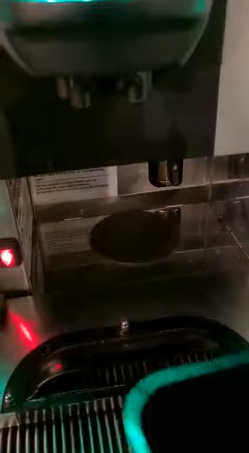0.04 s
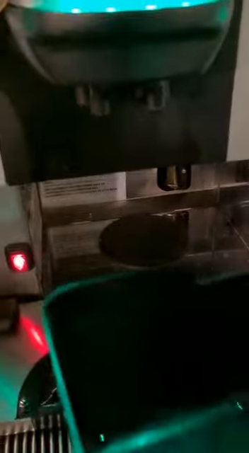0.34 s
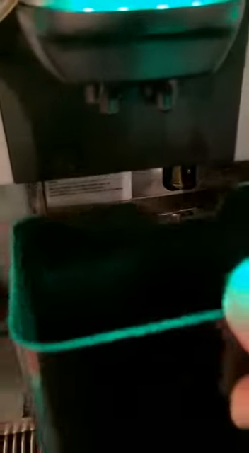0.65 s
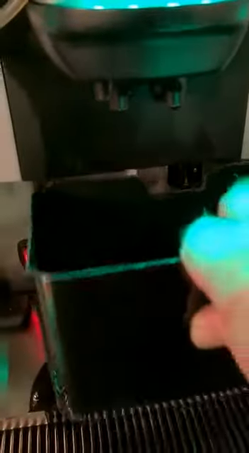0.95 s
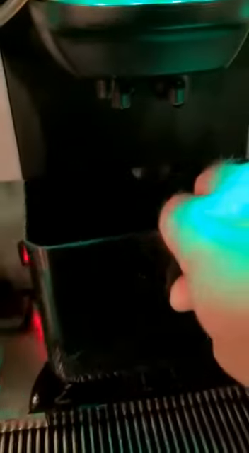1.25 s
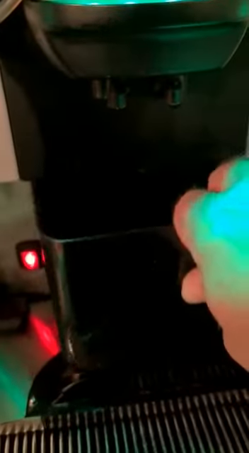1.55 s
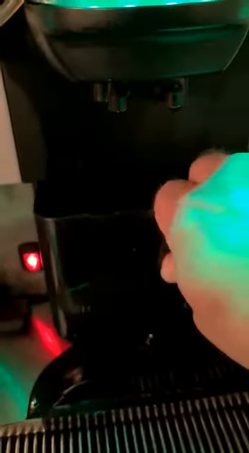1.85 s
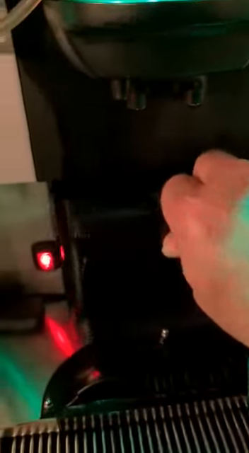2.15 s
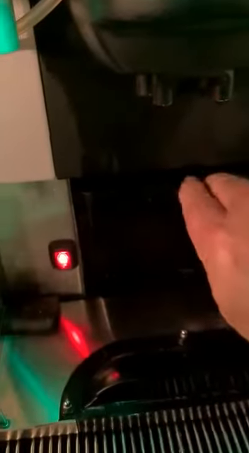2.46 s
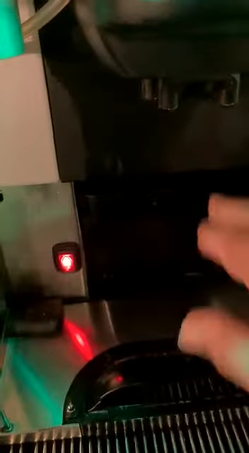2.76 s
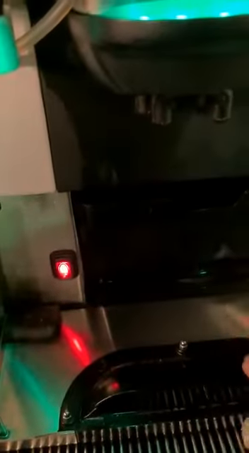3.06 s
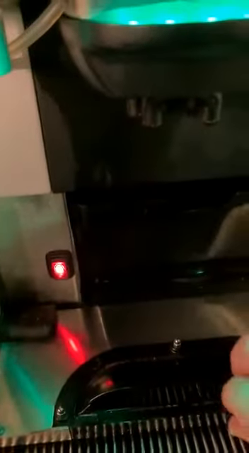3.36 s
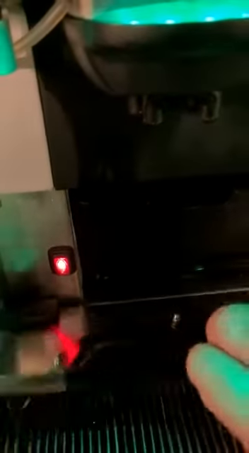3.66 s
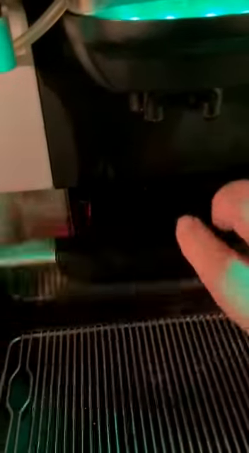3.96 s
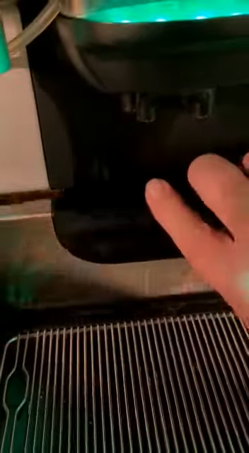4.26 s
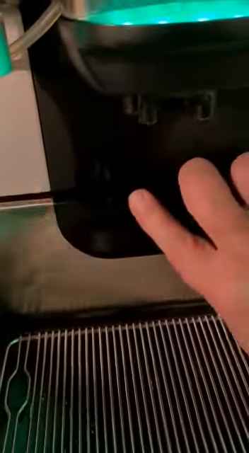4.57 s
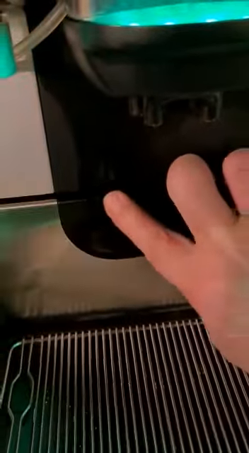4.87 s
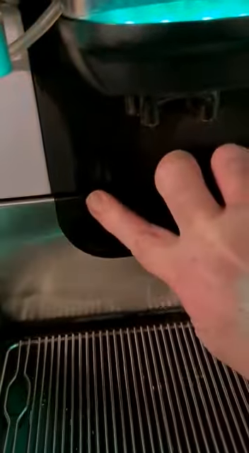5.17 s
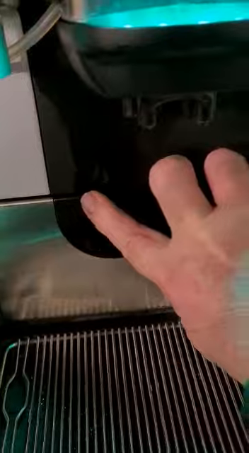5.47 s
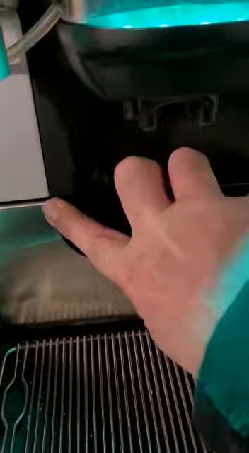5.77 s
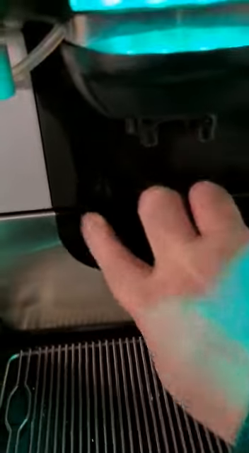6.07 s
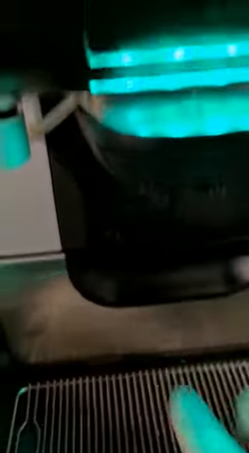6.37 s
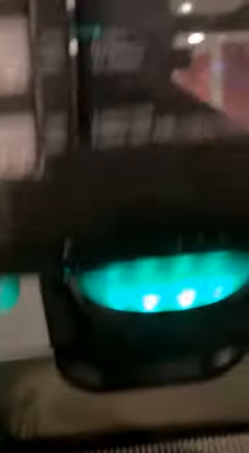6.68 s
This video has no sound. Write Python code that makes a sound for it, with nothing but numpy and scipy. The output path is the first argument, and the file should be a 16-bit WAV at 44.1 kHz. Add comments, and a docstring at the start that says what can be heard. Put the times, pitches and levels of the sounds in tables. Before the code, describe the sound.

Close, hollow plastic knocks and a short slide as a coffee machine's bin is seated, followed by door taps and a sharp latch snap.

```python
"""In a small room, close to a coffee machine, a hand fits the hollow plastic grounds bin.
It knocks and rebounds against the opening, slides in and seats; then the service door is swung shut,
pressed and latched. Each impact excites the damped normal modes of bin, frame, door or metal case,
and the room reverberates. Sliding friction gives noise and stick-slip gives two faint squeaks,
all over a low hum and a soft hiss."""
import sys
import numpy as np
from scipy import signal
from scipy.fft import rfft, irfft
from scipy.io import wavfile
from scipy.ndimage import uniform_filter1d

SR = 44100
rng = np.random.default_rng(int(sys.argv[2]) if len(sys.argv) > 2 else 0)


def wav_out(sig):
    """Save sig, one row per channel (or a flat mono array), as 16-bit PCM at SR to the path in sys.argv[1]."""
    wavfile.write(sys.argv[1], SR, np.round(np.clip(np.atleast_2d(sig).T, -1, 1) * 32767).astype(np.int16))


N = 301511


def amp(db):
    """Amplitude ratio of a level in decibels."""
    return 10 ** (np.asarray(db) / 20)


def unit(x):
    """Normalisation to unit rms."""
    return x / np.sqrt(np.mean(x ** 2) + 1e-20)


def at_hz(points, hz):
    """Interpolation on a logarithmic frequency axis."""
    f, value = np.transpose(points)
    return np.interp(np.log(hz + 1), np.log(f + 1), value)


def add(mix, s, sound):
    """Superposition: a stereo sound joins the mix at time s."""
    part = mix[:, max(round(s * SR), 0):][:, :sound.shape[1]]
    part += sound[:, :part.shape[1]]


# Balance between the ears: f/Hz, left minus right level/dB
BALANCE = [(100, -1), (300, -3), (550, 0.5), (1200, -3.5), (2500, -7), (5000, -1), (9000, -7.5),
           (15000, -3)]
def ears(hz):
    """Interaural level difference: left and right gains place the parts a little to the right."""
    return amp(np.multiply.outer([.5, -.5], at_hz(BALANCE, hz)))


# Likeness of the two ears: f/Hz, correlation (capped at 1)
COHERENCE = [(30, 0.3), (100, 1.32), (300, 0.9), (600, 0.44), (1200, 0.35), (3000, 0.06), (15000, 0.14)]
def noise(colour, size):
    """Partial coherence: coloured stereo noise, alike in the bass and unrelated in the treble."""
    hz = np.fft.rfftfreq(size, 1 / SR)
    left, other = rfft(rng.standard_normal((2, size)))
    same = np.clip(at_hz(COHERENCE, hz), -1, 1)
    pair = np.array([left, same * left + np.sqrt(1 - same ** 2) * other])
    return unit(irfft(pair * ears(hz) * amp(at_hz(colour, hz)), size))


# Steady tones: f/Hz, level/dB
HUM_TONES = [(60, -54), (101, -66), (127, -57.5), (243, -65), (732, -71)]
# Room noise: f/Hz, relative spectral density/dB
RUMBLE_SPECTRUM = [(12, -61), (20, -14.5), (27, -9.5), (43, -7), (64, -2), (134, -6.5), (156, -19),
                   (195, -11), (232, -4), (305, -16), (362, -14), (518, -19), (756, -18), (837, -28.5),
                   (1200, -25), (1560, -27.5), (2640, -120)]
HISS_SPECTRUM = [(290, -25), (500, -9), (621, -27), (668, -11), (1080, -29), (1480, 0.5), (2930, 0),
                 (5970, -8), (6800, -14), (7980, -35), (8960, -21), (11000, -15), (16000, -19.5)]
# The hiss swells as the arm moves: centre t/s, half width/s, level/dB
ARM_SWELLS = [(3.75, 0.41, -63.5), (5.66, 0.065, -61.5), (6.58, 0.33, -54)]
def background(waver_rad=0.62, rumble_db=-48, hiss_db=-63):
    """Incoherent sources add in power: rumble, hiss and a hum whose phases take a random walk."""
    t = np.arange(N) / SR
    hum = np.zeros(N)
    for hz, db in HUM_TONES:
        drift = np.interp(t, np.linspace(0, t[-1], 60), np.cumsum(rng.standard_normal(60)))
        hum += np.sqrt(2) * amp(db) * np.sin(2 * np.pi * hz * t + waver_rad * drift)
    rumble = amp(rumble_db) * noise(RUMBLE_SPECTRUM, N)
    swell_power = sum(amp(db) ** 2 * np.exp(-((t - s) / width) ** 2) for s, width, db in ARM_SWELLS)
    hiss = np.sqrt(amp(hiss_db) ** 2 + swell_power) * noise(HISS_SPECTRUM, N)
    return hum + rumble + hiss


def damped(x, t60, stretch):
    """Frequency-dependent damping: each frequency falls 60 dB in stretch times its T60."""
    hz, t, spectrum = signal.stft(x, SR, nperseg=128)
    decay_s = np.maximum(stretch * at_hz(t60, hz), .005)
    spectrum = spectrum * amp(-60 * t / decay_s[:, None])
    return signal.istft(spectrum, SR, nperseg=128)[1][:, :x.shape[1]]


# Edges of an impact's five bands (thump, hollow ring, clack, click, edge): f/Hz
BAND_EDGES = [100, 350, 800, 3300, 7200, 16500]
def contact(strength_db, thump_db, hardness, spot_hz, treble_db, focus_db, focus_octaves=0.99):
    """Excitation spectrum: weight adds thump, hardness adds treble, the struck spot favours its band."""
    centres = np.sqrt(np.multiply(BAND_EDGES[:-1], BAND_EDGES[1:]))
    octaves_above_ring = np.log2(centres[2:] / centres[1])
    upper_db = treble_db + hardness * octaves_above_ring  # clack, click and edge against the ring
    favoured = np.exp(-(np.log2(centres / spot_hz) / focus_octaves) ** 2)
    return strength_db + np.array([thump_db, 0, *upper_db]) + focus_db * favoured


# Colour of the panels' dense, overlapping modes; the sound also dips near 7.6-10.5 kHz and lifts near 11.8 kHz:
# f/Hz, relative spectral density/dB
PANEL_SPECTRUM = [(60, -7), (150, 3), (500, 5), (850, -1.5), (1200, 4.5), (2000, 4), (4000, -1), (6700, -8),
                  (7600, -20.5), (10500, -17), (11800, -13), (13500, -19), (15800, -21)]
# Decay of the panels and of the room: f/Hz, T60/s
PANEL_DECAY = [(100, .13), (400, 0.13), (1000, 0.19), (3000, 0.094), (7000, 0.068), (15000, 0.082)]
ROOM_DECAY = [(100, 0.32), (400, 0.73), (1000, 0.32), (3000, 0.25), (7000, 0.16), (15000, 0.04)]
def impacts(rows, modes, treble_db, focus_db, ring, panel_db, room_db,
            spot_db, spot_cycles, crack_db, lag_rad, rise_s, spread_db):
    """Impulse response: modes, panels and room decay freely; ring scales the T60 of modes and panels."""
    size, attack = SR // 2, SR // 70
    t, out = np.arange(size) / SR, np.zeros((2, N))
    bands = [signal.butter(3, edges, 'band', fs=SR, output='sos')
             for edges in zip(BAND_EDGES, BAND_EDGES[1:])]
    scatter_rad = rng.uniform(-2.5, 2.5, len(modes) + 1)
    own_panel, own_room = noise(PANEL_SPECTRUM, size), noise(PANEL_SPECTRUM, size)
    for s, strength_db, thump_db, hardness, spot_hz in rows:
        # the struck spot adds a mode of its own
        hz, db, t60 = np.transpose([*modes, (spot_hz, spot_db, spot_cycles / spot_hz)])
        # modes of 400-800 Hz reach the left ear first; higher ones arrive from all round
        right_lag = np.where(hz < 400, 0, np.where(hz < 800, lag_rad, scatter_rad))
        # each point of contact weights the modes differently, and the grip detunes them
        weight, detune, offset = rng.standard_normal((3, len(hz)))
        phase = 2 * np.pi * np.outer(hz * (1 + .005 * detune), t) + (offset * hz / 1000)[:, None]
        fade = amp((db + spread_db * weight)[:, None] - 60 * t / (ring * t60[:, None]))
        left, right = ears(hz)
        tones = np.array([left @ (fade * np.sin(phase)),
                          right @ (fade * np.sin(phase - right_lag[:, None]))])
        # the panels crack for a few milliseconds; the room answers a little later
        crack = 1 + amp(crack_db) * np.exp(-t / 0.0058)
        panel = crack * damped(unit(own_panel + 0.72 * noise(PANEL_SPECTRUM, size)), PANEL_DECAY, ring)
        room = damped(unit(own_room + noise(PANEL_SPECTRUM, size)), ROOM_DECAY, 1)
        room *= 1 - np.exp(-t / 0.004)
        sound = (tones + amp(panel_db) * panel + amp(room_db) * room) * (1 - np.exp(-t / rise_s))
        levels_db = contact(strength_db, thump_db, hardness, spot_hz, treble_db, focus_db)
        for band, level_db in zip(bands, levels_db):
            part = signal.sosfilt(band, sound)
            attack_rms = np.sqrt(np.mean(part[:, :attack] ** 2))
            add(out, s, part * amp(level_db) / attack_rms)
    return out


# Bin against the opening: t/s, level/dB, relative thump/dB, hardness/(dB/octave), spot f/Hz
BIN_IMPACTS = [(0.3715, -13.5, -14, 2.46, 1015), (0.379, -23.5, -2.5, 5, 1154), (0.881, -28, -12, 0.5, 570),
               (0.92, -28, -28, -2.5, 554), (0.9395, -19.5, -4.5, 2, 696), (0.9945, -11.5, -14, 2, 507),
               (1.038, -22.5, -12, 1.2, 558), (1.0665, -17.5, -16, -5.5, 493), (1.085, -39, -5, 3.5, 490),
               (1.16, -31, -13, 0.5, 540), (1.1995, -20.5, -10.5, -3.5, 486), (1.222, -35, 8, 4, 514),
               (1.236, -23, -12, -0.5, 545), (1.246, -11.5, -14, -0.5, 670), (1.425, -34, -3, 2.5, 480),
               (1.455, -16.5, -0.5, 5, 660), (1.472, -12.5, -8.5, 0.7, 472), (1.484, -15, -6.5, 1.5, 452),
               (1.499, -15.5, -25, -0.5, 625), (1.549, -32, -20, 3.5, 477), (1.584, -31, -14, 2, 536),
               (1.66, -35, -13, 0, 686), (1.865, -35, -28, -4, 517), (1.897, -32.5, -12, -4, 655)]
# Modes of the hollow bin: f/Hz, relative level/dB, unscaled T60/s
BIN_RESONANCES = [(115, -21.5, 0.073), (211, -10.5, 0.1), (367.4, -14.5, 0.13), (459, -10, 0.047),
                  (475.7, -1, 0.24), (538, 7, 0.052), (656.3, 2, 0.18), (720, -20, 0.047),
                  (1025.5, -5, 0.2), (1162, -2, 0.18), (1330, 1.5, 0.042), (1556, -3, 0.1),
                  (1882, 0.5, 0.066), (2021, -3, 0.12), (2640, -24, 0.075), (2870, -4, 0.037),
                  (3320, 2.5, 0.03), (3320, -46, 0.071), (4320, -3, 0.06), (5200, -39, 0.028),
                  (5850, -13, 0.085)]
# Its clack, click and edge at zero hardness: relative level/dB
BIN_BRIGHTNESS = [-9.5, -22, -37.5]
def bin_knocks(rebound_s=.008, rebound_db=-7, rebound_db_per_octave=-1.8):
    """Inelastic collision: the loose bin lands twice, its second edge weaker and duller."""
    rows = []
    for s, db, thump_db, hardness, hz in BIN_IMPACTS:
        rows.append((s, db, thump_db, hardness, hz))
        rows.append((s + rebound_s, db + rebound_db, thump_db, hardness + rebound_db_per_octave, hz))
    return impacts(rows, BIN_RESONANCES, BIN_BRIGHTNESS, focus_db=1.06, ring=0.66,
                   panel_db=2.5, room_db=-11, spot_db=2.5, spot_cycles=87,
                   crack_db=-19, lag_rad=1.35, rise_s=0.0013, spread_db=3.3)


def rubbing(colour, strokes, attack_s, release_s, grain_db, grains_per_s):
    """Friction noise: amplitude follows sliding speed and flickers as the plastic catches unevenly."""
    t, speed = np.arange(N) / SR, np.zeros(N)
    for s, length, db in strokes:
        rise = np.clip((t - s) / attack_s, 0, 1)
        fall = np.exp(-np.maximum(t - s - length, 0) / release_s)
        speed += amp(db) * rise * fall
    catches = np.interp(t * grains_per_s, np.arange(N), rng.standard_normal(N))
    return unit(noise(colour, N) * amp(grain_db * catches)) * speed


# Pushes of the hand: t/s, duration/s, level/dB
BIN_PUSHES = [(0.493, 0.031, -63), (0.857, 0.44, -56.5), (1.262, 0.11, -56), (1.547, .12, -49),
              (1.71, 0.37, -51.5), (2.022, 0.37, -42.5)]
# Plastic sliding on plastic: f/Hz, relative spectral density/dB
SLIDE_SPECTRUM = [(180, -30), (300, -9), (379, -3), (546, -14), (645, -2), (856, -18), (1120, -10.5),
                  (1660, -14), (2030, -10), (2250, -14.5), (6410, -19.5), (7950, -37), (11100, -25.5),
                  (16000, -28)]
def bin_slide():
    """Sliding friction: the bin rubs along its guides with a coarse grain."""
    return rubbing(SLIDE_SPECTRUM, BIN_PUSHES, attack_s=0.038, release_s=0.026,
                   grain_db=-2.2, grains_per_s=140)


# Bin against its stops: t/s, level/dB, relative thump/dB, hardness/(dB/octave), spot f/Hz
STOP_IMPACTS = [(2.002, -22.5, -16, 1, 673), (2.162, -40.5, -42, 1.5, 600), (2.275, -36, -20, 2.3, 4500),
                (2.297, -20, -8, 1.17, 1910), (2.333, -34, 0, -11, 486), (2.3985, -16.5, -41, 0.5, 633),
                (2.4015, -20.5, 1.5, 0.5, 750)]
# Modes of the frame: f/Hz, relative level/dB, unscaled T60/s
FRAME_RESONANCES = [(106, -3, 0.16), (286, -4, 0.24), (371.6, -12, 0.39), (468, -1.5, 0.3),
                    (516, -8, 0.087), (658, -0.5, 0.17), (816, -22, 0.31), (980, -3, 0.098),
                    (1070, 3, 0.14), (1380, 1, 0.076), (1525, 2.5, 0.086), (1893, 0, 0.1), (2485, -6, 0.05),
                    (2950, 1.5, 0.099), (3400, -3, 0.13), (4100, -29, 0.17), (5700, 2, 0.027)]
# Its clack, click and edge at zero hardness: relative level/dB
FRAME_BRIGHTNESS = [-2, -7, -19]
def bin_seating():
    """Momentum transfer: the bin meets its stops and sets the frame ringing."""
    return impacts(STOP_IMPACTS, FRAME_RESONANCES, FRAME_BRIGHTNESS, focus_db=2.5, ring=0.84,
                   panel_db=9, room_db=-8, spot_db=1, spot_cycles=60,
                   crack_db=6.5, lag_rad=0.85, rise_s=0.0011, spread_db=6.2)


# Scuffs of the door's edges: t/s, duration/s, level/dB
EDGE_SCUFFS = [(3.119, 0.054, -48.5), (4.634, 0.036, -49.5), (5.099, 0.039, -33)]
def door_scuffs():
    """Friction excites the panels' dense modes, hardest as the catch rides up its ramp."""
    return rubbing(PANEL_SPECTRUM, EDGE_SCUFFS, attack_s=0.015, release_s=.005,
                   grain_db=0.5, grains_per_s=1100)


# Faint squeaks: t/s, duration/s, f/Hz, fractional rise in pitch, level/dB
SLIPS = [(3.145, 0.077, 1440, 0.01, -48.5), (5.886, 0.064, 1376, 0.091, -51)]
def squeaks(jitter=.04, rasp=.45):
    """Stick-slip oscillation: a short, rough tone that rises a little."""
    out = np.zeros((2, N))
    for s, length, hz, rise, db in SLIPS:
        progress = np.linspace(0, 1, round(length * SR))
        wobble, grip = unit(uniform_filter1d(rng.standard_normal((2, len(progress))), size=90))
        pitch_hz = hz * (1 + rise * progress + jitter * wobble)
        tone = (1 + rasp * grip) * np.sin(2 * np.pi * np.cumsum(pitch_hz) / SR)
        envelope = np.sin(np.pi * progress) * (1 - progress)
        add(out, s, ears(hz)[:, None] * amp(db) * unit(tone * envelope))
    return out


# Blows on the door: t/s, level/dB, relative thump/dB, hardness/(dB/octave), spot f/Hz
DOOR_IMPACTS = [(3.168, -55.5, -7, 2.5, 2930), (3.61, -54, -15, 0.5, 3400), (4.04, -57.5, -15, 1.5, 4700),
                (4.337, -49.5, 4, -2.5, 1600), (4.517, -33, 2, 0.6, 1047), (4.6585, -35.5, 5, 3, 1050),
                (4.741, -39.5, -6, -6, 1290), (4.98, -60.5, 25, 5.4, 3610), (5.425, -47.5, -10, -7.5, 1035),
                (5.735, -47.5, 5, -6, 1187), (5.855, -43, 2, -2.5, 1122), (5.948, -57, 6.5, -1, 1308)]
# Modes of the plastic door: f/Hz, relative level/dB, unscaled T60/s
DOOR_RESONANCES = [(180.7, -7.5, 0.24), (353, -4, 0.046), (672, 2, 0.13), (691, -14, 0.088),
                   (1044, -12, 0.41), (1023, -4.5, 0.17), (1160, -7, 0.22), (1268, -18.5, 0.084),
                   (1850, 0.5, 0.17), (2683, -0.5, 0.056), (2850, -26.5, 0.065), (3063, -2, 0.064),
                   (4020, -20.5, 0.086), (4900, -3, .06), (5570, -3.5, 0.06)]
# Its clack, click and edge at zero hardness: relative level/dB
DOOR_BRIGHTNESS = [-1.5, -7.5, -17]
def door_knocks():
    """Point excitation of a plate: knocks and finger taps ring the closing door at the spot's pitch."""
    return impacts(DOOR_IMPACTS, DOOR_RESONANCES, DOOR_BRIGHTNESS, focus_db=11, ring=0.77,
                   panel_db=8, room_db=-10, spot_db=17, spot_cycles=87,
                   crack_db=-5.5, lag_rad=.3, rise_s=0.00063, spread_db=3.1)


# Latch against its catch: t/s, level/dB, relative thump/dB, hardness/(dB/octave), spot f/Hz
LATCH_IMPACTS = [(5.109, -33, 3.5, -.8, 6675), (5.119, -25, -5.5, -0.9, 830), (5.1285, -26.5, 4, 3.5, 4097),
                 (5.1405, -21.5, -12, 1.9, 3580), (5.158, -39.5, 6.5, -2.3, 906)]
# Modes of the sheet-metal case: f/Hz, relative level/dB, unscaled T60/s
CASE_RESONANCES = [(181, 1.5, 0.13), (205, -1.5, 0.089), (286, -5.5, 0.43), (421, -6.5, 0.34),
                   (422, -18, 0.42), (493, -12.5, 0.72), (508.4, -8.5, 0.42), (1044, -2, 0.35),
                   (1035, 5.5, .12), (1300, -20.5, 0.24), (1640, -3.5, 0.25), (2120, -2, .1),
                   (2650, -15, 0.35), (2640, 0, 0.14), (2930, -10.5, 0.36), (3338, -10.5, 0.25),
                   (3400, -13, 0.11), (3420, -13, .14), (3980, -19, 0.43), (4524, -9.5, 0.19),
                   (4830, -1, 0.086), (5130, -1.5, .14), (6000, -5.5, 0.16), (6700, -16.5, 0.11),
                   (10820, -10.5, 0.054), (13450, -20.5, 0.15)]
# Its clack, click and edge at zero hardness: relative level/dB
CASE_BRIGHTNESS = [0.5, -4.5, -8.5]
def latch():
    """Structure-borne sound: the latch rides over its catch, snaps in and shakes the case."""
    return impacts(LATCH_IMPACTS, CASE_RESONANCES, CASE_BRIGHTNESS, focus_db=2, ring=0.67,
                   panel_db=11.5, room_db=-6, spot_db=10, spot_cycles=120,
                   crack_db=-1, lag_rad=.1, rise_s=0.0014, spread_db=2.8)


def scene():
    """Linear superposition: impacts and friction of bin and door add to the room's background."""
    knocks = bin_knocks() + bin_seating() + door_knocks() + latch()
    friction = bin_slide() + door_scuffs() + squeaks()
    return knocks + friction + background()


def record(dry):
    """Clipping and band limiting: peaks are held at full scale, then low-pass filtered."""
    lowpass = signal.firwin(301, cutoff=16150, window=("kaiser", 9), fs=SR)
    return signal.oaconvolve(np.clip(dry, -1, 1), lowpass[None], "same", axes=1)


dry = scene()
out = record(dry)
wav_out(out)
```